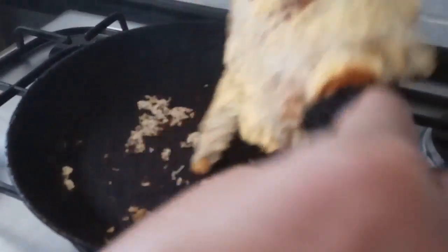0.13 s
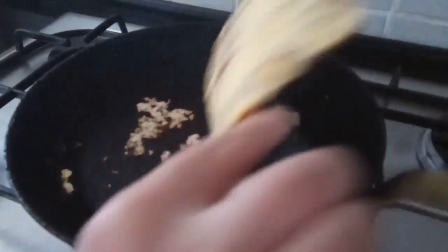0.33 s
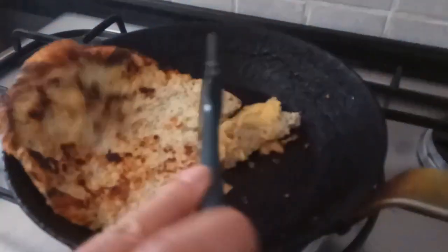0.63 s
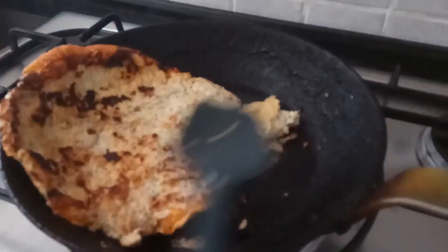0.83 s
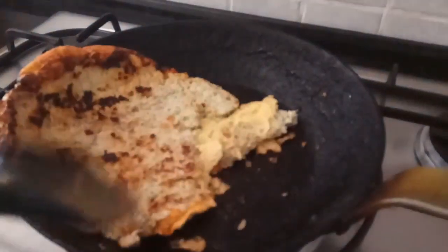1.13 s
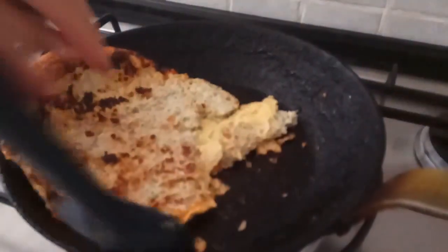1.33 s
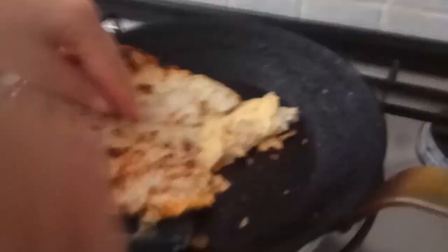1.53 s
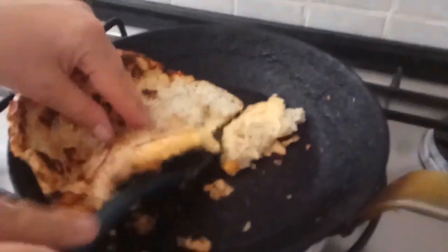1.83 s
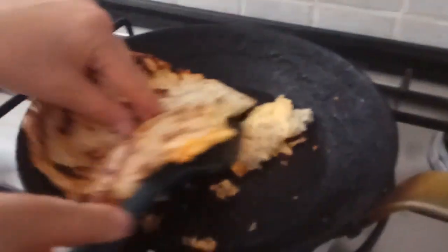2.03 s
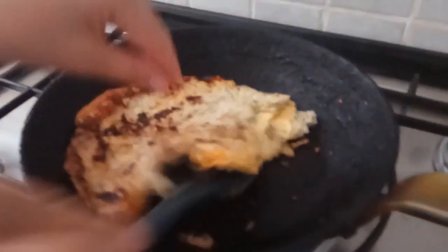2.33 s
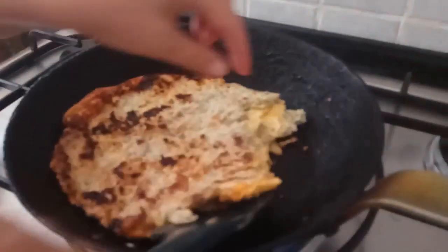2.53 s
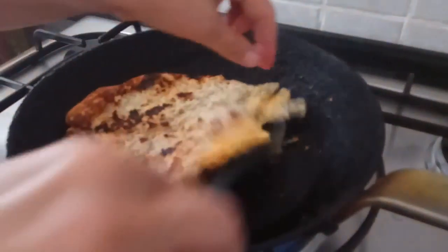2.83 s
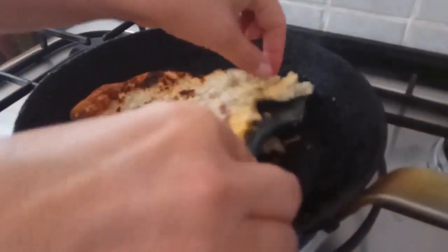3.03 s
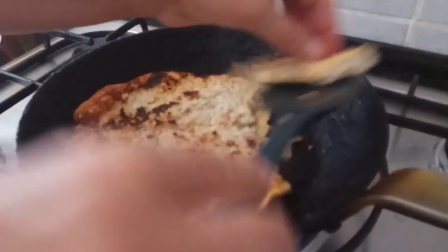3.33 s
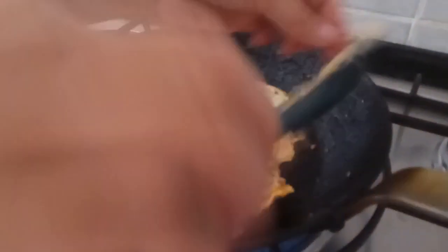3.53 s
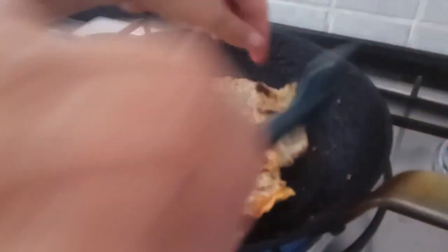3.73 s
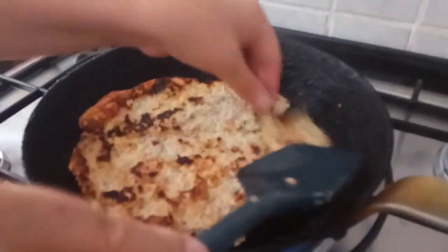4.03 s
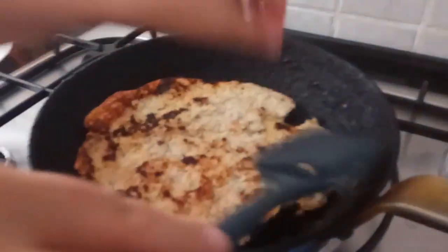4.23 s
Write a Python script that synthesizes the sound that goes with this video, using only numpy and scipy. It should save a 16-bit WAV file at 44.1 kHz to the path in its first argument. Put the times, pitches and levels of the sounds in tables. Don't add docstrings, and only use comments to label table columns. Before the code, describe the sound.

Hot fat sizzles and spits as a meat pancake lands in a frying pan, followed by spatula pats, scrapes, pan clunks and a low stove hum.

```python
import sys
import numpy as np
from scipy import signal
from scipy.fft import rfft, irfft, next_fast_len
from scipy.io import wavfile
from scipy.ndimage import uniform_filter1d, map_coordinates

SR = 44100
rng = np.random.default_rng(int(sys.argv[2]) if len(sys.argv) > 2 else 0)


def invert_db(level):
    return 10 ** (np.asarray(level, dtype=float) / 20)


def put_to_file(sound):
    columns = np.atleast_2d(sound).T
    safe = np.clip(columns, -1, 1)
    whole_steps = np.round(safe * 32767)
    wavfile.write(sys.argv[1], SR, whole_steps.astype(np.int16))


N = 193276


def unit(x):
    return x / np.sqrt(np.mean(x ** 2) + 1e-20)


def curves(rows):
    s, *cols = np.transpose(rows)
    return [np.interp(np.arange(N) / SR, s, c) for c in cols]


def wobble(rate):
    knots = rng.standard_normal(int(N * rate / SR) + 4)
    return map_coordinates(knots, [np.arange(N) * rate / SR])


def swell(s, rise, fade):
    t = np.maximum(np.arange(N) / SR - s, 0)
    return (1 - np.exp(-t / max(rise, 1e-4))) * np.exp(-t / max(fade, 1e-3))


def filtered(x, response):
    m = next_fast_len(N + SR // 2)
    return irfft(rfft(x, m) * response(np.fft.rfftfreq(m, 1 / SR)), m)[..., :N]


def coloured(x, points):
    f, db = np.transpose(points)

    def gain(hz):
        return invert_db(np.interp(np.log(hz + 1), np.log(f), db, left=-120, right=-120))

    return unit(filtered(x, gain))


def patchy(patchy_db):
    z = signal.stft(rng.standard_normal(N + 512), nperseg=256)[2]
    field = uniform_filter1d(rng.standard_normal(z.shape), 5, 0)
    field = uniform_filter1d(field, 12, 1)
    noise = signal.istft(z * invert_db(patchy_db * unit(field)), nperseg=256)[1]
    return unit(noise[:N])


def bursts(rate, spread_db, t60):
    popping = rng.random(N) < rate / SR
    sizes = popping * invert_db(spread_db * np.minimum(rng.exponential(size=N), 3.5))
    puff = invert_db(-60 * np.arange(SR // 50) / SR / t60)
    return unit(signal.fftconvolve(sizes, puff)[:N] * rng.standard_normal(N))


def ringing(modes):
    t = np.arange(SR) / SR
    waves = np.zeros(SR)
    for k, (hz, db, t60) in enumerate(modes):
        waves += (-1) ** k * invert_db(db - 60 * t / t60) * np.sin(2 * np.pi * hz * t)
    return waves * (1 - np.exp(-t / 0.0026))


# centre in seconds, half length in seconds, loss in dB.
STEADY_HOLDS = [
    (1.801, 0.042, 30),
    (1.84, .012, 20),
    (2.383, 0.016, 22),
    (2.5, .022, 25),
    (3.106, 0.046, 17),
    (4.269, 0.021, 23.5),
]


def steadied():
    t = np.arange(N) / SR
    return invert_db(-sum(db * np.exp(-((t - s) / half) ** 4) for s, half, db in STEADY_HOLDS))


# start in seconds, level in dB.
STOVE_SHAKES = [(0.38, -38.5), (0.72, -22), (0.92, -29), (1.148, -46), (1.4, -35), (1.56, -36), (2.05, -42),
                (2.22, -38.5), (2.62, -34), (2.95, -37), (3.45, -33.5), (3.6, -47), (3.78, -52), (4.0, -47),
                (4.2, -39.5)]
# frequency in Hz, level in dB per Hz.
HUM_SPECTRUM = [(20, -8), (50, -14), (80, -8.5), (115, 0.5), (160, -9), (228, 0.5), (290, -13.5),
                (400, -22)]
# frequency in Hz, level in dB per Hz.
FLAME_SPECTRUM = [(300, -30), (450, -13), (600, -12.5), (690, 3.5), (780, -7.5), (895, 5), (1000, -5),
                  (1250, -1), (1500, -49.5)]


def burner():
    rise_s, t60_s, idle_db = 0.047, 1.3, -50
    level = invert_db(idle_db) + sum(invert_db(db) * swell(s, rise_s, t60_s / np.log(1000)) for s, db in STOVE_SHAKES)
    hush_db = 19.5 * swell(1.76, rise=0.016, fade=0.18)
    hum = level * invert_db(wobble(10) - hush_db) * coloured(patchy(patchy_db=3.5), HUM_SPECTRUM)
    flame = invert_db(-42.5 + 1.1 * wobble(5)) * coloured(patchy(patchy_db=0.5), FLAME_SPECTRUM)
    return steadied() * hum + flame


# frequency in Hz, level in dB, t60 in seconds.
GRATE_MODES = [(67.7, -13, 0.33), (115.2, -2.5, 0.28), (142.3, -4, 0.11)]
# start in seconds, level in dB.
PAN_ROCKS = [(0.709, -14.5), (0.733, -20), (0.819, -43), (0.958, -20.5), (1.065, -18.5), (1.182, -26),
             (1.249, -39), (1.288, -37), (1.358, -34), (1.438, -22), (1.501, -30), (1.56, -33),
             (2.559, -23.5), (3.514, -36), (3.748, -47)]


def rocks():
    pan, grate = np.zeros(N + SR), ringing(GRATE_MODES)
    for s, db in PAN_ROCKS:
        pan[round(s * SR):][:SR] += invert_db(db + 1.5) * grate
    return pan[:N]


# start in seconds, rim level in dB, overtones in dB over the rim.
PAN_BUMPS = [(0.389, -32.5, -15), (0.44, -31.5, -32), (0.488, -34.5, -22), (0.559, -45, -23),
             (0.619, -51, -22), (1.369, -29, -32), (1.405, -26, -19), (1.447, -28.5, -25),
             (1.474, -29.5, -25), (1.741, -45, -11.5), (2.558, -17, -14), (2.6, -12.5, -13),
             (3.214, -42, -13.5), (3.451, -34.5, -13.5), (3.53, -34.5, -10), (3.579, -35, -11.5),
             (3.771, -44, -16), (4.012, -37, -20)]
# frequency in Hz, level in dB, t60 in seconds.
RIM_MODES = [(227.4, 1.5, 0.7)]
# frequency in Hz, level in dB, t60 in seconds.
OVERTONE_MODES = [(275, 4.5, 1), (398.8, 1.5, 0.58), (591, -17, 0.47), (770, -17, .3), (860, -18, 0.27)]
# start in seconds, loss in dB.
RIM_GRIPS = [
    (.69, 13.5),
    (1.52, 13),
    (1.83, 25),
    (2.74, 8),
    (3.1, 8.5),
    (3.68, -1.5),
    (4.08, 8),
]


def bumps():
    grip_s = 0.016
    pan, t = np.zeros(N + SR), np.arange(SR) / SR
    rim, overtones = ringing(RIM_MODES), ringing(OVERTONE_MODES)
    for s, db, overtones_db in PAN_BUMPS:
        loss_db = sum(loss * np.clip((s + t - at) / grip_s, 0, 1) for at, loss in RIM_GRIPS if at > s)
        pan[round(s * SR):][:SR] += invert_db(db + 1.5 - loss_db) * (rim + invert_db(overtones_db) * overtones)
    return pan[:N]


# start in seconds, peak in dB, grate in dB, slap in dB.
SPATULA_PATS = [(0.39, -32.5, -10, 0), (0.759, -9, -33, -13), (0.91, -5.5, -18.5, -12.5),
                (1.017, -9.5, -30, -13), (1.119, -16, -14, -13), (1.224, -27, -10, -7.5),
                (1.566, -44.5, -7, 10.5), (1.64, -35, -2, -0.5), (1.662, -35, -11, 6),
                (2.557, -23.5, -3, -12.5), (3.442, -24, -16, -13)]
# frequency in Hz, level in dB, t60 in seconds.
THUD_MODES = [(207.3, -3, 0.26), (226.2, -1, 0.17), (293, -28, 0.044)]
# centre in Hz, width in Hz, level in dB.
SLAP_RESONANCES = [(390, 370, 15), (627, 160, 12), (960, 310, -1.5), (1450, 1100, -5), (3560, 2000, 8.5)]


def pats():
    pan, blows, t = np.zeros(N + SR), np.zeros(N), np.arange(SR // 10) / SR
    thud, grate = ringing(THUD_MODES), ringing(GRATE_MODES)
    for s, db, grate_db, slap_db in SPATULA_PATS:
        pan[round(s * SR):][:SR] += invert_db(db + 1.5) * (thud + invert_db(grate_db) * grate)
        flat_blow = invert_db(24) * (t == 0)
        wet_smack = invert_db(-60 * t / 0.087) * rng.standard_normal(len(t))
        blows[round(s * SR):][:len(t)] += invert_db(db + slap_db + 4.5) * (flat_blow + wet_smack)

    def food(f):
        total = 0
        for k, (centre, width, db) in enumerate(SLAP_RESONANCES):
            loss = 1j * f * width
            total = total + (-1) ** k * invert_db(db) * loss / (centre * centre - f * f + loss)
        return total

    return pan[:N] + filtered(blows, food)


# time in seconds, level in dB.
SCRAPE_LEVEL = [
    (0.7, -37),
    (0.768, -33.5),
    (0.902, -31),
    (1.0, -32),
    (1.216, -38),
    (1.582, -38.5),
    (1.746, -42.5),
    (1.79, -46.5),
]
# frequency in Hz, level in dB per Hz.
CRUST_SPECTRUM = [(250, -3), (330, -1.5), (400, -10), (480, -4), (560, -4), (655, -4.5), (755, 1),
                  (900, -8.5), (1250, -0.5), (1600, -52)]


def scrape():
    first_s, last_s = SCRAPE_LEVEL[0][0], SCRAPE_LEVEL[-1][0]
    rub_db, = curves([(first_s - 0.02, -90)] + list(SCRAPE_LEVEL) + [(last_s + 0.04, -90)])
    catches = patchy(patchy_db=2.5) + 0.25 * bursts(rate=220, spread_db=3, t60=0.02)
    return invert_db(rub_db + 0.5) * coloured(catches, CRUST_SPECTRUM)


# start in seconds, fade in seconds, level in dB.
BLADE_SCUFFS = [(1.64, 0.067, -23), (1.45, 0.11, -32), (1.93, 0.13, -37), (2.08, 0.049, -34),
                (2.17, 0.21, -32), (2.4, 0.12, -37.5), (2.62, .2, -32.5), (2.85, 0.071, -45),
                (3.1, .1, -43), (3.62, .1, -38), (3.79, 0.085, -27), (4.08, 0.12, -37.5), (4.3, 0.1, -29)]
# frequency in Hz, level in dB per Hz.
METAL_SPECTRUM = [(420, -32.5), (550, -3), (900, -2), (1500, -4.5), (2200, -8), (3000, -4), (4200, -49)]


def scuffs():
    level = sum(invert_db(db) * swell(s, 0.027, fade) for s, fade, db in BLADE_SCUFFS)
    grit = patchy(patchy_db=8.5) + 0.4 * bursts(rate=360, spread_db=2.5, t60=0.005)
    return level * coloured(grit, METAL_SPECTRUM)


# start in seconds, peak in dB, centre in Hz.
FAT_SPITS = [(0.0648, -24.5, 5810), (0.1589, -12, 4840), (0.185, -7, 5800), (0.1994, -5, 6330),
             (0.3646, -2, 4200), (0.4005, 2, 8900), (0.5807, 5, 6430), (0.6034, 0, 6990),
             (0.627, 10.5, 4530), (0.7374, -3, 6600), (0.8814, 5, 5900), (1.4053, 5.5, 5960),
             (1.8951, -22, 6570), (2.1632, 7, 3000), (2.191, -8, 5650), (2.2217, 1, 6130),
             (2.2424, 7, 6790), (3.6494, -30, 7000), (3.6994, 9, 5210), (3.7936, -25, 6460),
             (3.8474, -15, 5600), (3.9744, -8, 6360), (4.1224, -12, 6000)]


def spits():
    t60_s = 0.011
    out, t = np.zeros(N + SR), np.arange(SR // 10) / SR
    for s, db, hz in FAT_SPITS:
        noise = rng.standard_normal(len(t))
        tuned = unit(signal.lfilter(*signal.iirpeak(hz, 1.3, SR), noise))
        crack = unit(np.diff(noise, 2, prepend=[0, 0]))
        puff = invert_db(db - 13.0) * tuned + invert_db(-15 + 0.85 * db) * crack
        out[round(s * SR):][:len(t)] += invert_db(-60 * t / t60_s) * puff
    return out[:N]


# time in seconds, frying in dB, fineness of the bubbles in dB.
SIZZLE_COURSE = [(0.0, -26.5, -2.5), (0.17, -25.5, 2), (0.34, -20.5, 2), (0.6, -23, 4), (0.75, -19.5, -1),
                 (0.95, -22, -4), (1.3, -24, -4), (1.56, -24.5, -4.5), (1.7, -20.5, -1.5), (1.82, -21, 6),
                 (2.15, -23, -0.5), (2.37, -19, 0), (2.68, -20.5, 0), (3.1, -23, 1.5), (3.3, -20.5, 0.5),
                 (3.5, -20.5, 0.5), (3.95, -18, -1.5), (4.38, -21, -1.5)]
# time in seconds, frying missing until then in dB.
FOOD_LANDINGS = [
    (0.3636, 6.5),
    (0.3985, 5),
]
# start in seconds, swell in dB, fade in seconds, fineness shift in dB.
FAT_SURGES = [(0.18, 7, .05, -1), (0.2, 1, 0.019, 1.5), (0.3645, 2, 0.017, -3), (0.4, 8.5, 0.017, 4),
              (0.5, 6.5, .06, -2.5), (0.628, 5.5, 0.072, -4.5), (0.72, 4, 0.027, -7),
              (0.868, 7.5, 0.065, -4.5), (1.42, 7, 0.044, -1.5), (1.6, 3, 0.087, -2.5),
              (1.66, 8.5, 0.042, -2), (1.821, 9, 0.026, 0.5), (1.87, 0, 0.02, -2.5),
              (1.94, 4.5, 0.048, -6.5), (2.21, 8, 0.12, -1), (2.73, 4, 0.29, 0), (2.5, -2, 0.048, 0),
              (2.56, 0.5, .06, 0.5), (2.85, 2, .05, -1), (2.919, -0.5, 0.068, 0.5), (3.08, 3.5, 0.054, 4.5),
              (3.17, -6, 0.046, 1.5), (3.341, 6, 0.099, -3.5), (3.72, 1, 0.048, 3.5), (3.79, 2, 0.017, -4),
              (3.855, -6, .03, 2), (3.91, 2.5, 0.04, -4), (4.14, 2, 0.12, 1.5), (4.25, 1, .06, 0.5),
              (4.35, -2, 0.037, 0.5)]
# frequency in Hz, level in dB per Hz.
COARSE_SPECTRUM = [(300, -28.5), (600, -22), (1000, -15), (1700, -12.5), (2600, -6.5), (4000, -4.5),
                   (5000, -4), (7000, -39)]
# frequency in Hz, level in dB per Hz.
FRYING_SPECTRUM = [(2500, -72), (4000, -27), (5200, -2), (6700, 1.5), (7250, -5), (7700, -10), (9000, -12)]
# frequency in Hz, level in dB per Hz.
SPRAY_SPECTRUM = [(6500, -12.5), (8000, -11), (9500, -5), (11000, -4.5), (12500, -7), (13800, -22.5),
                  (15000, -29)]
# frequency in Hz, level in dB per Hz.
JETS_SPECTRUM = [(11500, -35.5), (13000, -19.5), (14100, -19), (14700, -10), (15480, -12), (15700, -36)]


def sizzle():
    fry_db, fine_db = curves(SIZZLE_COURSE)
    fry_db = fry_db - sum(db * (np.arange(N) < s * SR) for s, db in FOOD_LANDINGS)
    shapes = np.array([swell(s, 0.0018, fade) for s, _, fade, _ in FAT_SURGES])
    swell_db = np.transpose(FAT_SURGES)[1] @ shapes
    fine_db = fine_db + np.transpose(FAT_SURGES)[3] @ shapes
    surge_db = 0.4 * wobble(17) + 0.94 * wobble(45)
    pops = bursts(rate=640, spread_db=4, t60=0.0063) + 0.58 * bursts(rate=140, spread_db=0.5, t60=0.00056)

    def layer(colour, db, leans, swells, flutter_db, flutter_rate, pop_db, patchy_db):
        level_db = db + leans * fine_db + swells * swell_db + flutter_db * wobble(flutter_rate)
        return invert_db(level_db) * coloured(patchy(patchy_db) + invert_db(pop_db) * pops, colour)

    coarse = layer(COARSE_SPECTRUM, db=-0.5, leans=-0.14, swells=0.36,
                   flutter_db=0.77, flutter_rate=17, pop_db=-10.5, patchy_db=2.0)
    coarse *= invert_db(0.2 * (fry_db + 21.5))
    frying = layer(FRYING_SPECTRUM, db=0, leans=0, swells=1,
                   flutter_db=0.76, flutter_rate=21, pop_db=-10.5, patchy_db=0.1)
    spray = layer(SPRAY_SPECTRUM, db=0.9, leans=0.63, swells=0.94,
                  flutter_db=0.18, flutter_rate=19, pop_db=-7, patchy_db=1.22)
    jets = layer(JETS_SPECTRUM, db=2, leans=1.4, swells=0.55,
                 flutter_db=1.4, flutter_rate=22, pop_db=-8.5, patchy_db=-0.9)
    return invert_db(fry_db + surge_db) * (coarse + frying + spray + jets)


def scene():
    pan = steadied() * (pats() + rocks()) + bumps()
    return np.tile(sizzle() + spits() + scrape() + scuffs() + pan + burner(), (2, 1))


# frequency in Hz, level in dB.
AUDIBLE_FLOOR = [(40, -20), (200, -31), (330, -14), (450, -15.5), (580, -14.5), (700, -14.5), (1600, -13.5),
                 (2500, -29)]
# frequency in Hz, level in dB.
NOISE_SWAP = [(5000, -1), (6500, -1), (8000, -2.5), (10000, -3.5), (12000, -2.5), (14000, -1)]


def thrifty(x, luck_db, faint):
    frame, grid = 2048, 70
    shape = dict(window="cosine", nperseg=frame, noverlap=frame // 2)
    lead = frame // 2 - grid
    hz, _, z = signal.stft(np.pad(x, ((0, 0), (lead, 0))), SR, **shape)
    band = np.where(hz < 2500, hz // 86, 30 + hz // 689).astype(int)
    member = band == np.unique(band)[:, None]
    power = member @ np.abs(z[0]) ** 2 / member.sum(1)[:, None] + 1e-20
    centre = member @ hz / member.sum(1)
    treble = (centre > 4600) & (centre < 14400)
    over_db = 10 * np.log10(power / power[centre > 4600].mean(0))
    lasting_db = uniform_filter1d(over_db, size=3, axis=1)
    floor_db = np.interp(centre, *np.transpose(AUDIBLE_FLOOR))[:, None]
    dropped = (lasting_db < floor_db) & (centre < 2500)[:, None]
    swap_db = np.interp(centre, *np.transpose(NOISE_SWAP))[:, None]
    swapped = treble[:, None] & (over_db + luck_db * rng.standard_normal(power.shape) < swap_db)
    z = z * (np.abs(z) ** 2 > faint * (member.T @ power))
    noise = signal.stft(rng.standard_normal((2, N + lead)), SR, **shape)[2]
    noise *= member.T @ np.sqrt(power) / np.sqrt(np.mean(np.abs(noise) ** 2))
    z = np.where(member.T @ swapped, noise, z) * ~(member.T @ dropped)
    return signal.istft(z, SR, **shape)[1][:, lead:lead + N]


def roll_off(x):
    return signal.sosfilt(signal.butter(12, 16870, fs=SR, output="sos"), x)


def record(dry):
    loud_db = 10 * np.log10(np.abs(uniform_filter1d(dry[0] ** 2, size=1800)) + 1e-12)
    even = dry * invert_db(-0.45 * np.maximum(loud_db + 18, 0))
    rounded = even / (1 + np.abs(even / 0.74) ** 4) ** (1 / 4)
    mix = filtered(rounded, lambda hz: hz < 15560)
    mix = thrifty(mix, luck_db=2.0, faint=0.49)
    return roll_off(mix)


dry = scene()
out = record(dry)
put_to_file(out)
```